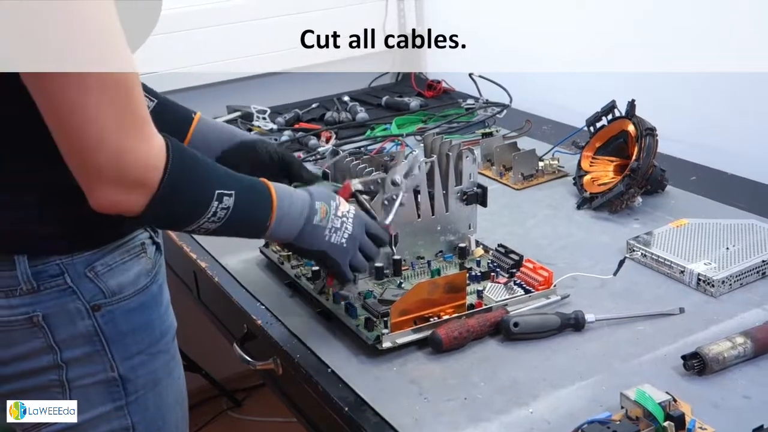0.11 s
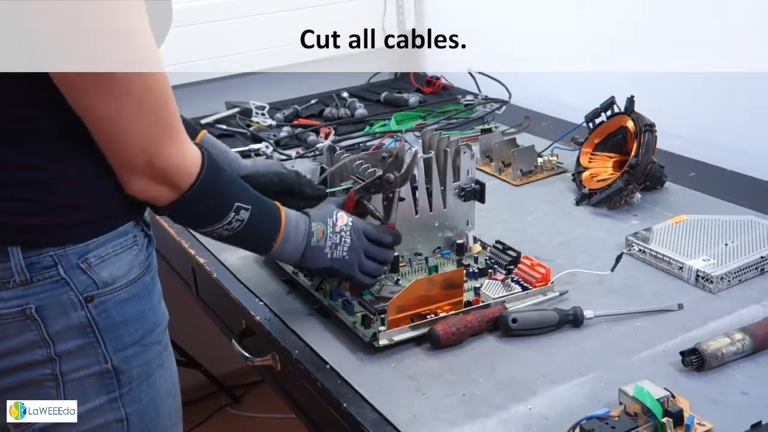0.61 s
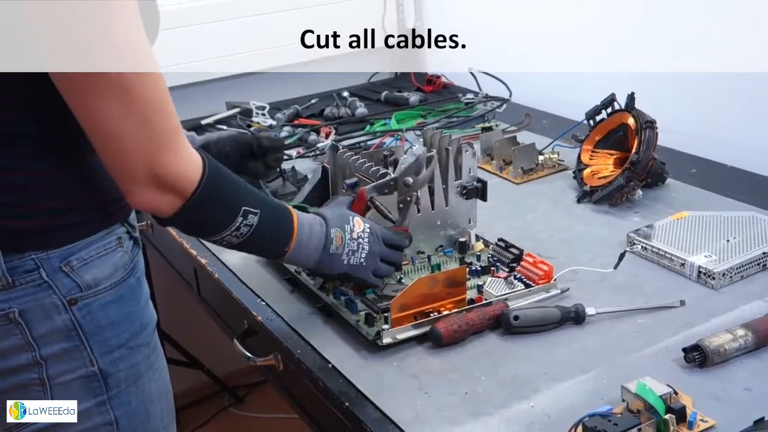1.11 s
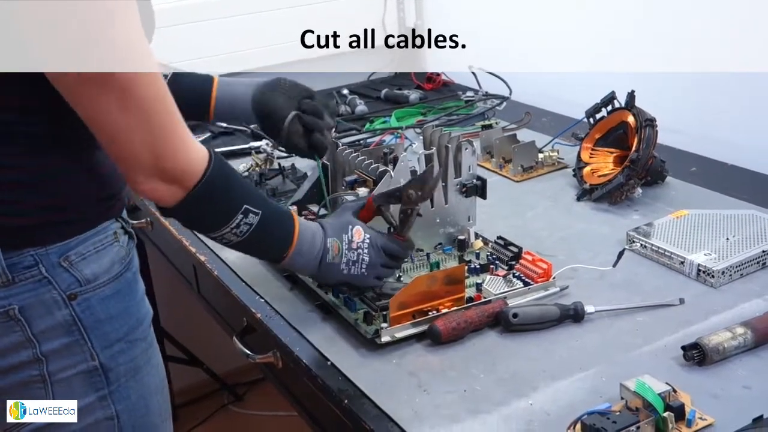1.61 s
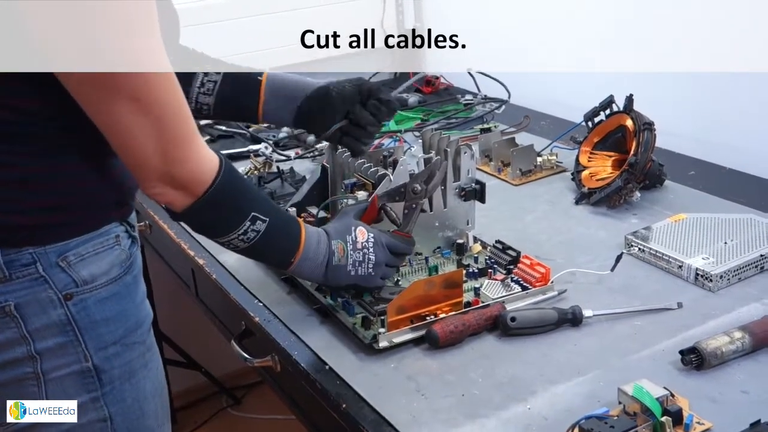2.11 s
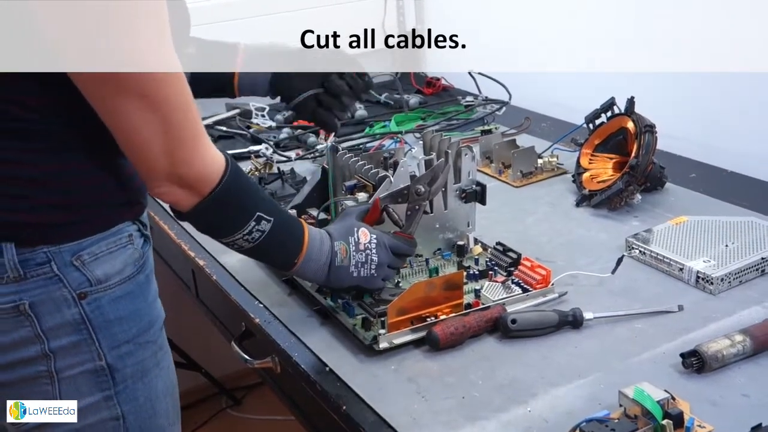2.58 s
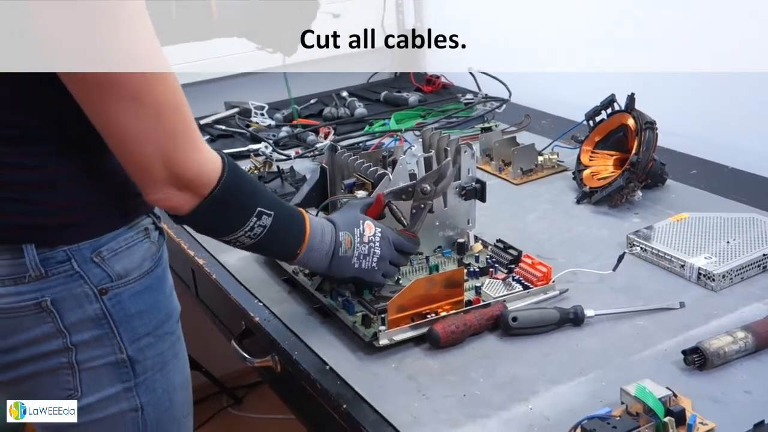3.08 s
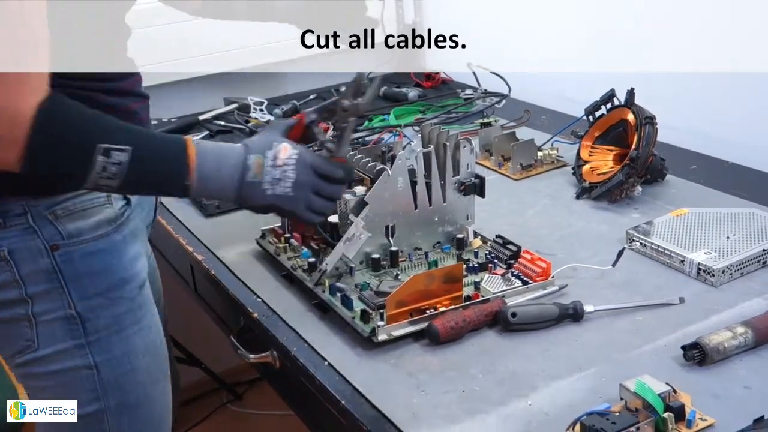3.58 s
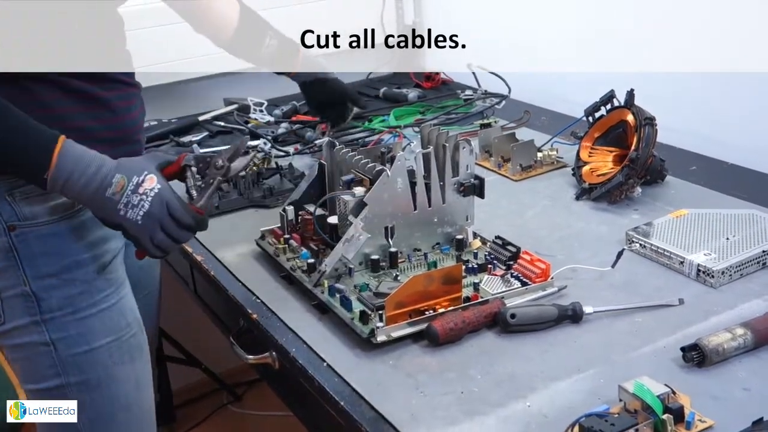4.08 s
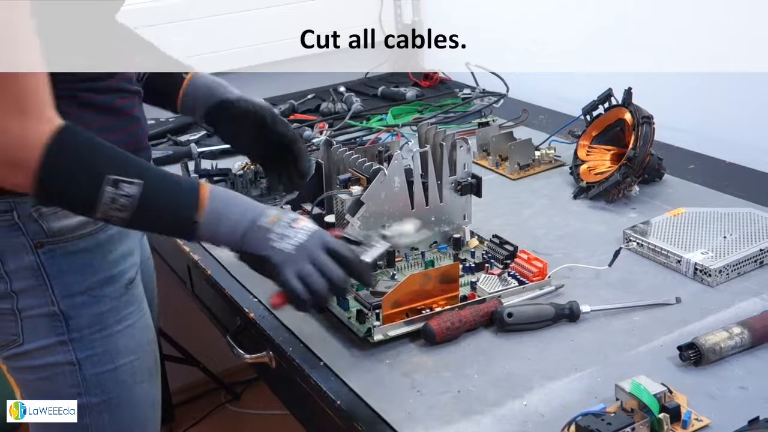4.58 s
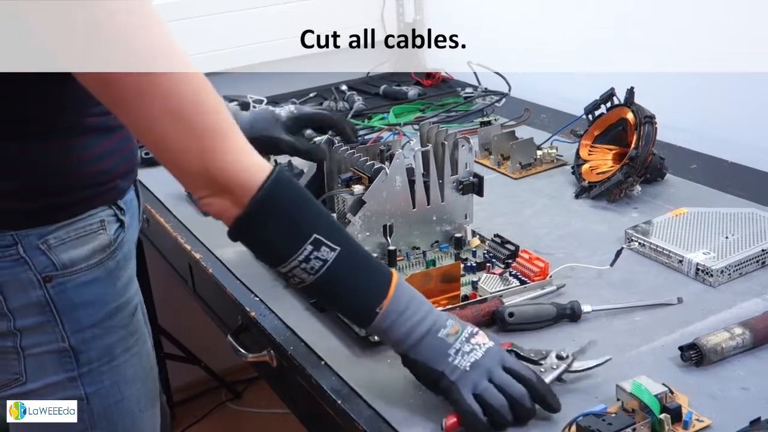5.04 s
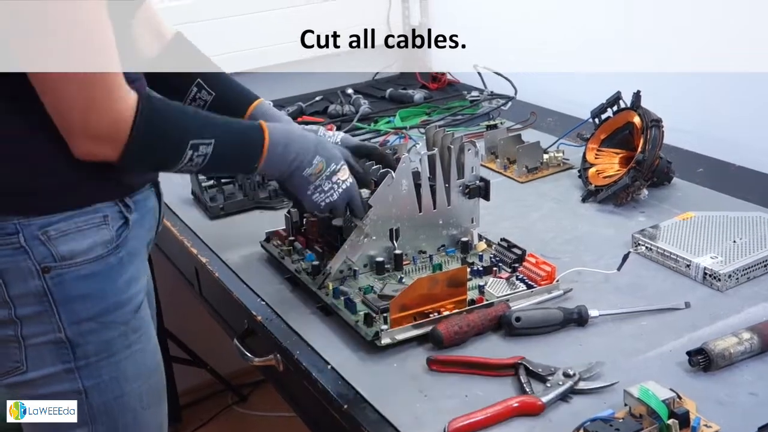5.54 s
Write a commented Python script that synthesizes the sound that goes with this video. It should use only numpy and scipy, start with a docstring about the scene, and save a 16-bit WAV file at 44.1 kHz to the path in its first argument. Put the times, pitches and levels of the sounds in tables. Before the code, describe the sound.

Cutters click and scrape inside a metal chassis on a workbench, one loud cable snip cracks out, then the tool is set down with a clunk.

```python
"""Gloved hands work cable cutters in a sheet-metal chassis on a workbench in a large bare workshop.
Wires rustle and metal clicks from the start, one cable snaps through at 2.7 s, and after sparser handling
the cutters are laid on the bench top at 5.2 s. Clicks are bursts of noise in four bands with a short sine,
thuds and ringing metal are struck modes, and rustle, rumble and air are shaped noise.
Two spaced microphones hear the work with a long echo made of decaying noise."""
import sys
import numpy as np
from scipy import signal
from scipy.fft import rfft, irfft
from scipy.io import wavfile

SR = 44100
rng = np.random.default_rng(int(sys.argv[2]) if len(sys.argv) > 2 else 0)


def transcribe(signal):
    """Save signal, clipped to [-1, 1], as a 16-bit WAV file at the path in sys.argv[1]."""
    frames = np.atleast_2d(signal).T
    limited = np.clip(frames, -1, 1)
    pcm = np.round(limited * 32767).astype(np.int16)
    wavfile.write(sys.argv[1], SR, pcm)


def volts_from_db(level):
    """Convert decibel levels to linear amplitude ratios."""
    exponent = np.asarray(level, float) / 20
    return 10 ** exponent


N = 250047
LEFT_RIGHT = np.array([[1], [-1]])

# blows that reach the bench: t/s, level/dB before the modes' own levels, favoured pitch f/Hz,
# left minus right/dB, fall away from that pitch/(dB per octave)
THUDS = [(0.002, -53.5, 515, -2, 15), (0.604, -32, 122, 5.5, 12.5), (0.689, -42.5, 125, 15, 26),
         (0.849, -35.5, 256, -2, 12.5), (0.889, -37.5, 213, 3.5, 32), (1.0, -43, 92, 12, 15),
         (1.119, -73, 70, 3, 21), (1.298, -49.5, 200, 7, 33), (1.773, -44.5, 860, 1, 26.5),
         (2.0, -48.5, 95, 10, 21), (2.1, -45.5, 96, 17.5, 18), (2.376, -40.5, 150, 5.5, 19),
         (2.696, -22, 116.7, 12, 17), (2.72, -40, 246, -9, 15), (3.248, -44.5, 94.5, 16, 22),
         (3.555, -44, 776, 0, 30), (4.109, -54.5, 300.7, 0.5, 21), (5.2, -22, 453, 0.5, 9.5),
         (5.204, -22, 177, 9.5, 14.5), (5.23, -26, 250, -12.5, 14.5), (5.271, -29.5, 250, 7, 17),
         (5.308, -26.5, 198, 9, 11), (5.352, -31.5, 186, -2, 18)]


def rms_one(x):
    """Scales a signal to rms 1."""
    return x / np.sqrt(np.mean(x ** 2) + 1e-20)


def at_hz(points, hz):
    """Reads a two-column table on a log-frequency axis."""
    table_hz, values = np.transpose(points)
    return np.interp(np.log(np.maximum(hz, 1)), np.log(table_hz), values)


def coloured(x, spectrum):
    """Filters a noise-like input to a spectrum and scales it to rms 1."""
    gain = volts_from_db(at_hz(spectrum, np.fft.rfftfreq(N, 1 / SR)))
    return rms_one(irfft(rfft(x) * gain, N))


def ring(force, hz, t60):
    """One mode as a two-pole resonator: a unit click starts a dying sine of initial height 1."""
    r = volts_from_db(-60 / (t60 * SR))
    w = 2 * np.pi * hz / SR
    return signal.lfilter([0, np.sin(w)], [1, -2 * r * np.cos(w), r * r], force + 1e-18)


def struck(modes, blows, scatter_db, opposed):
    """Where a thing is hit decides which of its modes answer most; every blow differs a little."""
    in_phase_below_hz = 220
    s, blow_db, favoured_hz, pan_db, db_per_octave = np.transpose(blows)
    at = np.round(s * SR).astype(int)
    out = np.zeros((2, N))
    for hz, mode_db, t60 in modes:
        octaves_away = np.abs(np.log2(hz / favoured_hz))
        level_db = blow_db + mode_db - db_per_octave * octaves_away + pan_db / 2 * LEFT_RIGHT
        force = np.zeros((2, N))
        force[:, at] = volts_from_db(level_db + scatter_db * rng.standard_normal((2, len(at))))
        polarity = rng.choice([-1, 1])
        # a wide body reaches the two microphones in opposed phase for some higher modes
        right_sign = np.sign(rng.random() - opposed * (hz > in_phase_below_hz))
        out += ring(force, hz, t60) * polarity * np.array([[1], [right_sign]])
    return out


def air():
    """Steady room noise, unrelated at the two microphones, with faint mains lines common to both."""
    # colour of the quiet workshop air: f/Hz, relative level/(dB per Hz)
    air_colour = [(18, -17), (30, 0), (68, -4.5), (157, -23), (204, -17.5), (259, -26.5), (374, -19),
                  (449, -26), (721, -25.5), (3580, -35), (11400, -46), (12600, -58), (16000, -70.5)]
    # mains hum: f/Hz, level/dB rms
    hum_lines = [(49.5, -68.5), (199, -76.5), (372, -84)]
    t = np.arange(N) / SR
    hum = sum(np.sqrt(2) * volts_from_db(db) * np.sin(2 * np.pi * (hz * t + rng.random())) for hz, db in hum_lines)
    return volts_from_db(-66) * coloured(rng.standard_normal((2, N)), air_colour) + hum


def rumble():
    """The loaded bench shudders in the bass, more on the left and after blows, and sways below that."""
    # weight of the hands on the work: t/s, level/dB before the left and right gains
    leaning = [(0.0, -68), (0.54, -64.5), (0.63, -50), (0.8, -52.5), (0.91, -49.5), (1.15, -51.5),
               (1.7, -59), (2.04, -56.5), (2.25, -61.5), (2.57, -56), (2.86, -51.5), (3.15, -54),
               (3.6, -58), (3.77, -68.5), (4.05, -64), (4.85, -72.5), (5.2, -62.5), (5.67, -64)]
    # colour of the shudder: f/Hz, relative level/(dB per Hz)
    rumble_colour = [(25, -28), (40, -5.5), (52, -2.5), (70, -3.5), (100, -0.5), (140, -16), (200, -14.5),
                     (300, -20.5), (500, -58.5)]
    # colour of the sway: f/Hz, relative level/(dB per Hz)
    sway_colour = [(6, -18), (12, 26), (20, 3), (27, -15), (40, -49)]
    left_db, right_db = 5, 1
    shudder_db, shudder_t60_s, shudder_rise_s = -23.5, 0.73, 0.06  # level relative to each blow
    sway_db = -59        # at mean weight
    sway_follows = 1.3   # dB of sway per dB of leaning
    t = np.arange(N) / SR
    lean_db = np.interp(t, *np.transpose(leaning))

    shaken = np.zeros(N)
    for s, blow_db, *_ in THUDS:
        since = np.maximum(t - s, 0)
        rise = 1 - np.exp(-since / shudder_rise_s)
        shaken += volts_from_db(blow_db + shudder_db - 60 * since / shudder_t60_s) * rise
    sides = volts_from_db([[left_db], [right_db]])
    shudder = (volts_from_db(lean_db) + shaken) * sides * coloured(rng.standard_normal((2, N)), rumble_colour)

    sway_level = volts_from_db(sway_db + sway_follows * (lean_db - lean_db.mean()))
    return shudder + sway_level * coloured(rng.standard_normal(N), sway_colour)


def rustle():
    """Wires and gloves rub as dense uneven grains; each rub swells, holds and fades."""
    # rubs: start of hold t/s, hold/s, held level/dB
    rubs = [(0, 0.02, -59.5), (0.46, 0.2, -72.5), (0.64, 0.033, -60), (0.867, 0.035, -51.5),
            (0.99, 0.019, -65.5), (1.204, 0.203, -66), (1.634, 0.27, -69.5), (2.0, 0.18, -78.5),
            (2.456, 0.11, -70), (2.774, 0.24, -67.5), (3.233, 0.018, -59.5), (3.471, 0.053, -77.5),
            (3.654, .35, -82.5), (4.101, 0.046, -72.5), (5.058, .12, -73), (5.232, 0.11, -61.5),
            (5.66, 0.048, -67)]
    # colour of wire on metal: f/Hz, relative level/(dB per Hz)
    rustle_colour = [(300, 2.5), (700, 5), (1500, 0), (2600, 2.5), (4000, -3.5), (6000, -8.5),
                     (9000, -17.5), (12000, -21), (14000, -37)]
    rise_db_per_s, fall_db_per_s = 200.5, 140.5
    grains_per_s, spread_db = 700, 3.0
    t = np.arange(N) / SR
    level = np.zeros(N)
    for s, hold, db in rubs:
        early = np.maximum(s - t, 0)
        late = np.maximum(t - s - hold, 0)
        level += volts_from_db(db - rise_db_per_s * early - fall_db_per_s * late)
    present = rng.random((2, N)) < grains_per_s / SR
    height = volts_from_db(spread_db * np.minimum(rng.exponential(1, (2, N)), 5))
    grains = present * height * rng.choice([-1, 1], (2, N))
    return level * coloured(grains, rustle_colour)


def thuds():
    """The heavy bench top takes up each blow gradually, so a one-pole low-pass softens its modes."""
    # modes of the bench: f/Hz, relative level/dB, t60/s
    bench = [(70, 3.5, 0.14), (99.6, -8.5, 0.2), (132.74, 0.5, 0.21), (183, -1, 0.19), (200, -6.5, 0.41),
             (229.6, -9, 0.42), (250, -14, 0.27), (278.6, -9, 0.3), (346, -5.5, 0.12), (392, 2.5, 0.066),
             (460.6, -2, 0.18), (515, -9, 0.38), (524.4, -4.5, 0.16), (560, -5.5, 0.23), (664, -2.5, 0.078),
             (726, -5, .07), (782, 1.5, 0.031), (860, -5.5, 0.08), (1000, -8, .06)]
    rise_hz = 300
    slow = np.exp(-2 * np.pi * rise_hz / SR)
    modes = struck(bench, THUDS, scatter_db=3.5, opposed=0.45)
    return signal.lfilter([1 - slow], [1, -slow], modes)


def metal():
    """Chassis plate and blades ring on in their own modes after some of the contacts."""
    # modes of sheet metal and blades: f/Hz, relative level/dB, t60/s
    plate_modes = [(238, 7.5, .35), (850, 2, 0.066), (1110, -7.5, 0.12), (1258, 1.5, 0.046),
                   (1400, -6, 0.025), (1560, -2.5, .03), (2730, -4, .04), (2960, -11, .1),
                   (3620, -4.5, 0.069), (3870, -0.5, .04), (4020, -3, .035), (5070, -2, .06), (5900, 1, .1),
                   (6320, -7, .08), (8350, -5, .04), (9800, -5, .08)]
    # blows that leave metal ringing: t/s, level/dB before the modes' own levels, favoured pitch f/Hz,
    # left minus right/dB, fall away from that pitch/(dB per octave)
    pings = [(0, -56.5, 238, -2, 60), (0.354, -66, 5900, 29, 58), (0.548, -58.5, 6040, -9, 60),
             (0.603, -38, 1050, -4, 48), (0.885, -41, 4200, -1, 60), (1.365, -51.5, 1110, 5, 43),
             (1.727, -46, 1461, 1, 42), (1.663, -58, 5070, -7, 62), (1.725, -48.5, 9800, -13, 14),
             (1.774, -54.5, 1350, 8, 57), (2.385, -56.5, 3800, -5, 61), (2.52, -58.5, 850, 0.5, 59.5),
             (2.6922, -23, 2898, 2, 18), (2.6945, -25, 1510, -3.5, 30.5), (3.228, -50.5, 3620, 14, 200.5),
             (3.241, -46, 3620, -16, 199.5), (3.243, -45.5, 1078, 5, 54), (5.2001, -35.5, 1400, 7, 63),
             (5.31, -33.5, 1470, -6, 69)]
    return struck(plate_modes, pings, scatter_db=1.5, opposed=0)


def clicks():
    """Each metal contact is a dying crackle in four bands with one short ring."""
    # metal contacts: t/s, overall level/dB, low part/dB, bright part/dB, strongest ring f/Hz;
    # parts are relative to the overall level, ahead of the common trim parts_db
    contacts = [(0.356, -39, -14, -18.5, 6100), (0.5466, -61.5, -26, -1, 6120),
                (0.5676, -50.5, -13, -8, 5900), (0.6003, -27, -14.5, -28.5, 1640),
                (0.6168, -35.5, -17.5, -10.5, 1000), (0.6418, -29, -24, -7, 7900),
                (0.6876, -35.5, -12, -28, 1023), (0.704, -42, -32, -18.5, 1070),
                (0.845, -27.5, -14.5, -15.5, 7600), (0.8687, -30.5, -38, -19, 2430),
                (0.8868, -31.5, -13, -15, 4100), (0.9076, -34, -23, -15.5, 2900),
                (0.9233, -32, -22, -17.5, 2220), (0.9707, -39.5, -30, -10.5, 4440),
                (0.9988, -25.5, -18.5, -25.5, 4060), (1.1108, -51, -14, -14, 5540),
                (1.1603, -46, -19, -15, 2850), (1.1896, -48.5, -28, -14, 1150),
                (1.3442, -49, -7, -19, 2100), (1.414, -54.5, -12, -20, 1090),
                (1.6621, -45.5, -21, -20, 4900), (1.724, -41, -13, -8.5, 10000),
                (1.772, -45.5, -4.5, -18, 1590), (1.8404, -35.5, -19.5, -16, 3800),
                (2.3764, -46.5, -13.5, -19.5, 4060), (2.386, -36, -13.5, -19.5, 5300),
                (2.5147, -43, -16.5, -14, 6740), (2.5794, -55, -13.5, -16.5, 1480),
                (2.6919, -8.5, -17, -16.5, 3700), (3.2164, -47, -13, -7.5, 3660),
                (3.243, -50.5, 1.5, -14, 3556), (3.917, -58, -4.5, -24.5, 1953),
                (4.034, -54.5, -13, -11.5, 1434), (4.101, -55, -12, -20, 1120),
                (4.741, -58.5, -21, -24.5, 2680), (5.1418, -57, -24, -16.5, 2210),
                (5.173, -41.5, -17, -19, 6340), (5.1985, -29.5, -11.5, -14, 1310),
                (5.2624, -48.5, -5, -20, 1544), (5.2789, -54.5, 3.5, -31.5, 1533),
                (5.3079, -35, -11.5, -17.5, 1490), (5.5995, -56.5, -17, -18.5, 3170)]
    # bands of the low, bright, top and middle parts: lower edge f/Hz, upper edge f/Hz (limited below)
    part_edges = [(967, 3516), (5720, 10000), (11000, 36000), (2590, 5320)]
    crack_t60_s, crackle_t60_s = 0.0077, 0.055
    parts_db, middle_db = -9, -12
    ring_db, ring_cycles = -12, 45   # the ring falls 60 dB in this many cycles
    out = np.zeros((2, N))
    t = np.arange(2048) / SR
    decay = volts_from_db(-60 * t / crack_t60_s) + volts_from_db(-60 * t / crackle_t60_s)
    banks = [signal.butter(4, np.clip(edges, 10, 0.45 * SR), "band", fs=SR, output="sos")
             for edges in part_edges]
    for s, level_db, low_db, bright_db, hz in contacts:
        # the top part follows the bright part; harder contacts reach higher
        top_db = bright_db - 4 + 0.366 * (level_db + 30)
        crack = rng.standard_normal((2, len(t))) * decay   # each microphone faces another edge
        parts = 0
        for bank, db in zip(banks, [low_db, bright_db, top_db, middle_db]):
            parts = parts + volts_from_db(db + parts_db) * rms_one(signal.sosfilt(bank, crack))
        tone = np.sin(2 * np.pi * (hz * t + rng.random((2, 1))))
        tone *= volts_from_db(ring_db - 60 * t * hz / ring_cycles)
        at = round(s * SR)
        out[:, at:at + len(t)] += volts_from_db(level_db) * (parts + tone)
    return out


def hall(x):
    """Dense echoes: noise that builds up, then dies band by band, different at each microphone."""
    # echo of the bare workshop: f/Hz, t60/s, relative level/dB
    hall_bands = [(60, 0.4, 0), (150, 0.54, 0), (400, 0.84, 5), (1000, 0.93, 4), (1870, 0.7, 0.5),
                  (5000, .68, -0.5), (9000, 0.5, -1.5), (15000, .36, 0)]
    hall_db, build_s = -5.5, 0.003
    t = np.arange(SR) / SR
    edges = 40 * 2 ** np.arange(0, 9, 0.75)
    t60s = np.array(hall_bands)[:, [0, 1]]
    levels = np.array(hall_bands)[:, [0, 2]]
    echo = np.zeros((2, SR))
    for low, high in zip(edges, edges[1:]):
        band_filter = signal.butter(2, [low, high], "band", fs=SR, output="sos")
        band = signal.sosfilt(band_filter, rng.standard_normal((2, SR)))
        hz = np.sqrt(low * high)
        echo += band * volts_from_db(at_hz(levels, hz) - 60 * t / at_hz(t60s, hz))
    echo *= 1 - np.exp(-(t / build_s) ** 2)
    echo /= np.sqrt(np.sum(echo ** 2, axis=1, keepdims=True))   # unit energy at each microphone
    return volts_from_db(hall_db) * signal.fftconvolve(x, echo, axes=1)[:, :N]


def scene():
    """The work sounds directly and through the hall, over bench rumble and room air."""
    work = clicks() + thuds() + rustle()
    rings = metal()
    echo = hall(work + volts_from_db(-7.5) * rings)   # ringing plates beam less into the hall than cracks do
    return work + rings + echo + rumble() + air()


def roll_off(x):
    """The treble ends steeply here."""
    return signal.sosfilt(signal.butter(12, 16990, fs=SR, output="sos"), x)


def record(dry):
    """The microphones fade steeply above 16.3 kHz."""
    mic_top = signal.butter(10, 16300, fs=SR, output="sos")
    mix = signal.sosfilt(mic_top, dry)
    return roll_off(mix)


dry = scene()
out = record(dry)
transcribe(out)
```